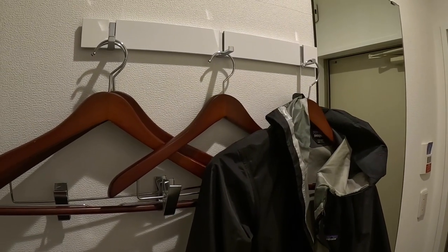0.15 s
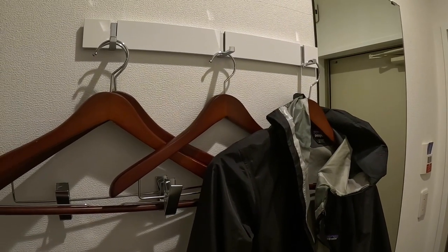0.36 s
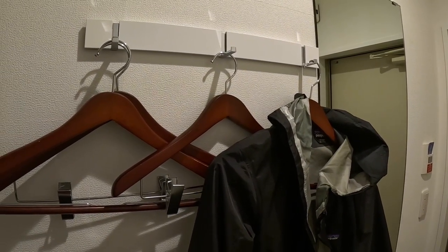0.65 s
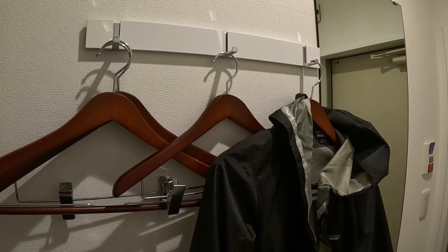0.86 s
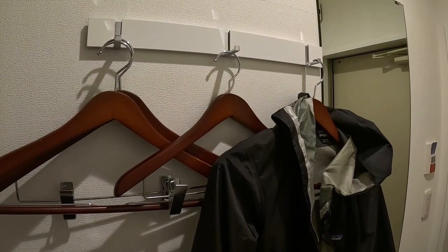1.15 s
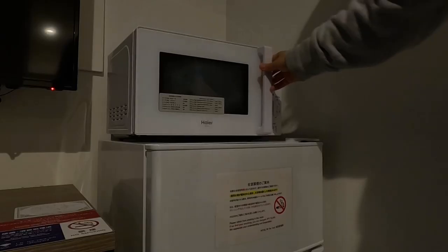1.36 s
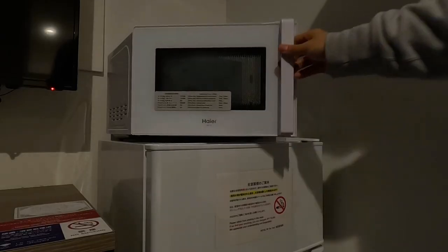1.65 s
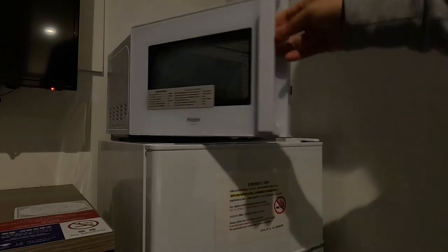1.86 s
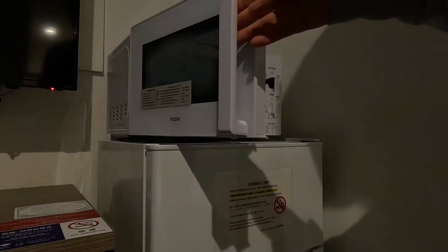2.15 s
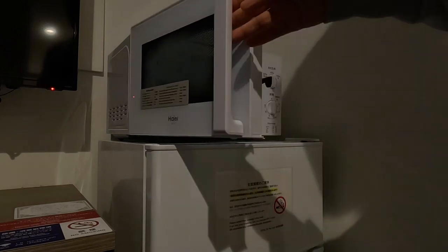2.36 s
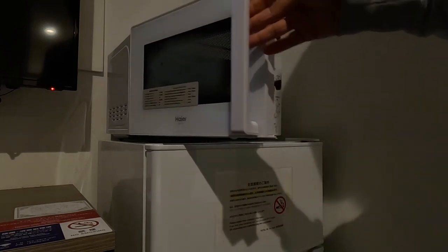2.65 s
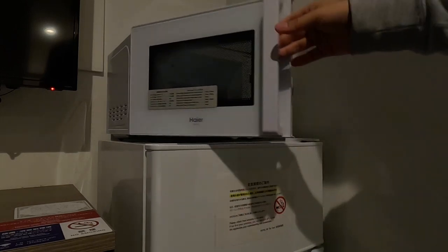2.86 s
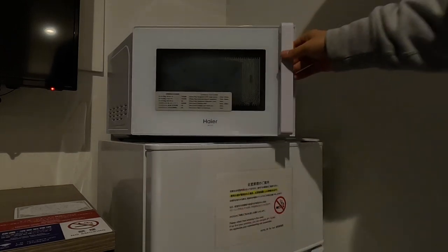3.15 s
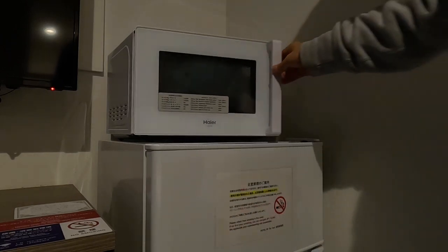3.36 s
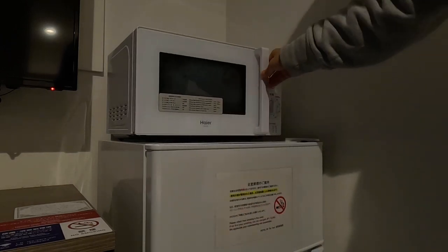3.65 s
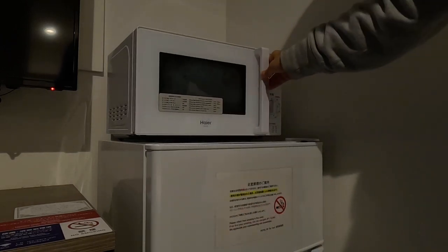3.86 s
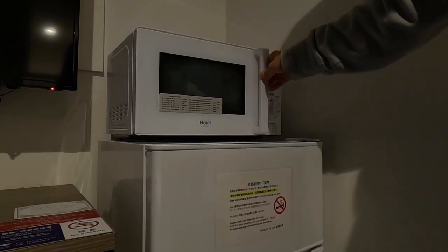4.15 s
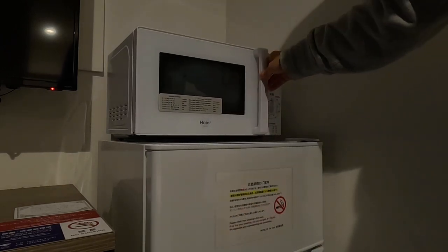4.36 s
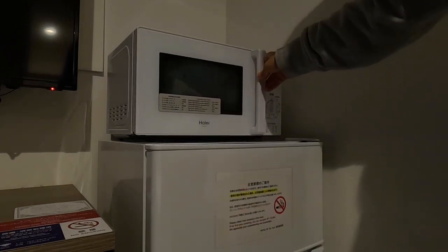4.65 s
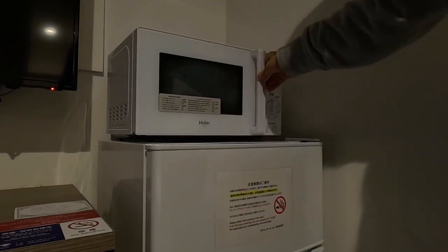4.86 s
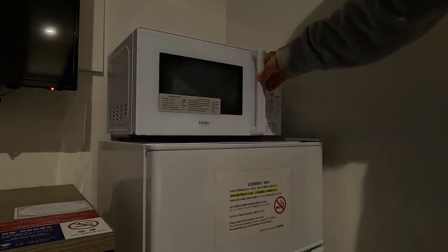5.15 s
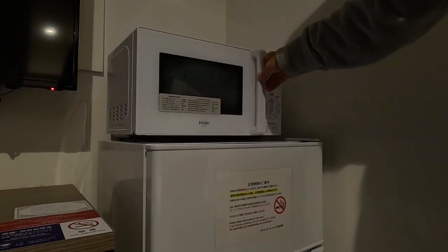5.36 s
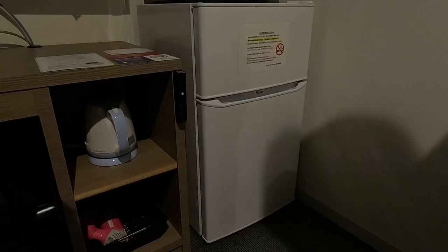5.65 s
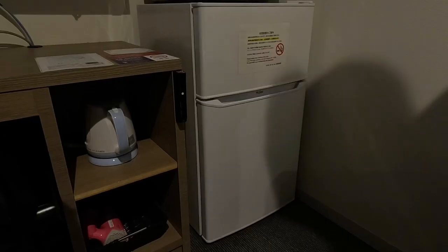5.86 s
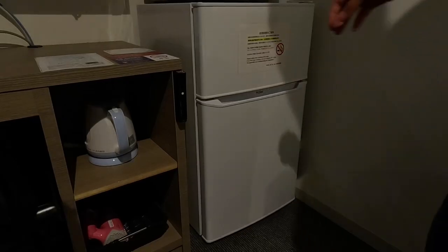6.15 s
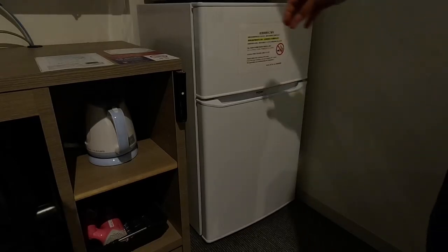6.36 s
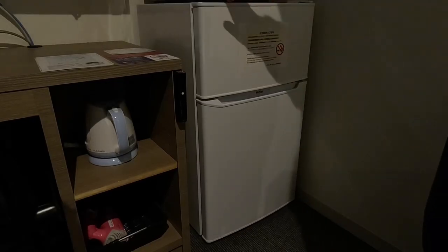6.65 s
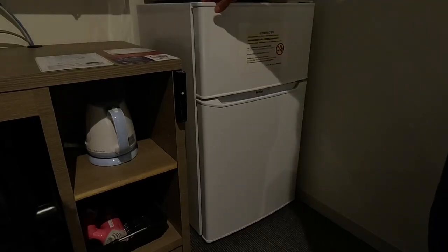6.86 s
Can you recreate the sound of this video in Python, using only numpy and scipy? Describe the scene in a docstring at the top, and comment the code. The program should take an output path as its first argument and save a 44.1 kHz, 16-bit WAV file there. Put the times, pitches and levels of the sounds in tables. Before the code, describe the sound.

A microwave door's latch lets go with a quick, loud clack, heard from nearby in a small room, and the open door rings briefly. After faint ticks and cloth rustling, the door touches its catch with a lighter click. A moment later it bangs shut with a hollow, ringing thud. Quiet rustles and small taps come last. Soft ventilation and a low building hum run underneath, changing tone slightly twice.

```python
"""A microwave oven door in a small room, over soft ventilation noise and the building's low rumble.
At 1.35 s the background noise changes at an edit cut; then the latch lets go, its impacts rattle the
panels and the free door rings in its normal modes. A sleeve rustles by friction as the door swings.
At 3.7 s the door touches its catch; at 4.6 s it is slammed: the body thuds, the sheet metal rings on.
A second cut at 5.6 s ends the ringing and changes the background; faint rustles and taps follow."""
import sys
import numpy as np
from scipy import signal
from scipy.fft import rfft, irfft, next_fast_len
from scipy.io import wavfile
from scipy.ndimage import uniform_filter1d

SR = 44100
rng = np.random.default_rng(int(sys.argv[2]) if len(sys.argv) > 2 else 0)


def inscribe(sig):
    """Save sig as 16-bit PCM at rate SR to the path in sys.argv[1].

    A 1-D sig is mono; a 2-D sig holds one channel per row.
    Samples are clipped to [-1, 1] before scaling.
    """
    pcm = np.round(np.clip(np.atleast_2d(sig).T, -1, 1) * 32767)
    wavfile.write(sys.argv[1], SR, pcm.astype(np.int16))


N = 309141
T = np.arange(N) / SR

# Latch, hinge and hand contacts: t/s, energy/dB, tilt/(dB/octave), hollow-door boost/dB, latch boost/dB,
# low thud/dB, high thud/dB, rattle time constant/s, share sent to the room/dB
CONTACTS = [(1.357, -28, 2, 0, 2, -52, -48, 0.011, -4.5), (1.3781, -15, 1, -0.5, 0, -36, -43, 0.009, 0),
            (1.4062, -1.5, 0.5, 1, 1, -35, -29, 0.0039, -4.5),
            (1.666, -34, -5.5, -12, -5, -65, -51, 0.0064, -2), (1.736, -39, -5, -7, 0, -54, -56, .008, -8),
            (1.782, -33, -4, -7, -6, -65, -52.5, 0.0063, -2),
            (1.912, -39.5, -5, 6, 0, -60, -54, 0.0068, -5.5),
            (3.069, -35.5, -1, 14.5, -3, -71, -46.5, .005, -1.5),
            (3.320, -40, 3.5, 6, -8, -65, -60, 0.0027, -9.5),
            (3.7224, -23.5, 1, 1, 3, -40, -36, .004, -4.5), (3.742, -38, -1, -6, 9, -38, -44, .0045, -.5),
            (4.531, -38, 2.5, -5, 0, -67.5, -58.5, 0.0022, -6),
            (4.609, -41, -5, 3, 1.5, -55, -57, 0.0072, -3),
            (4.624, -21, -1, 1.5, -1, -42, -47, 0.0071, -2.5),
            (4.6318, -6, 1.5, 4, 0, -38.5, -33, 0.0084, -3.5),
            (4.6432, -3.5, -2.5, -2.5, -8, -10, -13.5, 0.0022, -6),
            (4.689, -16, 0.5, -2, -1, -28, -28, 0.0097, 0), (4.965, -50, -3, 9, 0, -65, -63, .008, -5.5),
            (6.415, -45, 2, 3, 2, -68, -70, 0.0055, -13.5), (6.575, -55, -4, 0, 0, -52, -54, .008, 0),
            (6.899, -46, 5, 5, -4, -66, -81, .003, -7.5), (6.92, -55, -6, -6, 0, -38, -58, 0.0036, -4)]
# Modes of the hollow body: f/Hz, relative level/dB, T60/s
BODY_MODES = [(101, -11, 0.25), (116, -8.5, 0.3), (155.5, 2, 0.11), (162.3, -3, 0.42), (177, -1.5, 0.054),
              (195.4, -17.5, .4), (275.4, -5, .55), (283, -3, 0.2), (342.7, -3, 0.28), (380, -3, .14),
              (399, -11, 0.34), (468, -18, .3)]
# Broad resonances of latch, door and panels: f/Hz, bandwidth/Hz, relative level/dB
PANEL_RESONANCES = [(700, 760, -.5), (1350, 750, 1), (2450, 2500, -1), (3950, 1000, -1), (5400, 1100, -4),
                    (7260, 1300, -8.5), (9800, 2600, -11.5)]
def door_impacts():
    """Impact excitation: contacts rattle the panels and shake the body. Returns (direct, room feed)."""
    hollow_door, latch = 1, 3  # rows of PANEL_RESONANCES
    pivot_hz, thud_split_hz, thud_room_db = 2450, 190, -9
    direct, to_room = np.zeros((2, N + SR))
    t = np.arange(SR) / SR
    rattle_n = SR // 8
    rattle_t = t[:rattle_n]
    impulse = signal.unit_impulse(rattle_n)
    push = 1 - np.exp(-t / .003)  # a soft seal takes the blow, so the body swings up gradually
    low_thud = push * ring([m for m in BODY_MODES if m[0] <= thud_split_hz], t)
    high_thud = push * ring([m for m in BODY_MODES if m[0] > thud_split_hz], t)
    for start, energy_db, tilt_db, hollow_db, latch_db, low_db, high_db, decay_s, echo_db in CONTACTS:
        envelope = np.exp(-rattle_t / decay_s) * (1 - np.exp(-rattle_t / (.19 * decay_s)))
        bursts = rng.standard_normal((len(PANEL_RESONANCES), rattle_n)) * envelope
        rattle = smooth = 0
        for k, (hz, width_hz, panel_db) in enumerate(PANEL_RESONANCES):
            boost_db = hollow_db * (k == hollow_door) + latch_db * (k == latch)
            gain = undb(energy_db + panel_db + tilt_db * np.log2(hz / pivot_hz) + boost_db)
            edges_hz = hz - width_hz / 2, hz + width_hz / 2
            rattle += gain * unit_energy(band(bursts[k], *edges_hz))
            # the room gathers sound from all sides of the door, which evens out the colour
            smooth += gain * (-1) ** k * unit_energy(band(impulse, *edges_hz))
        thud = undb(low_db) * low_thud + undb(high_db) * high_thud
        i = int(start * SR)
        direct[i:i + SR] += thud
        direct[i:i + rattle_n] += rattle
        to_room[i:i + SR] += undb(echo_db + thud_room_db) * thud
        to_room[i:i + rattle_n] += undb(echo_db) * smooth
    return direct[:N], to_room[:N]


# Modes of the free door: f/Hz, initial rms level/dB, T60/s
DOOR_MODES = [(160, -38, 1.0), (295.6, -56.5, 4.7), (743.7, -65, .8), (882, -42.5, .6), (1180, -57, 1.4),
              (1480, -45, 0.85), (3327, -77, 1.0), (3784, -70.5, .9), (4840, -67, 1.3)]
# Modes of the shut cabinet: f/Hz, initial rms level/dB, T60/s
CABINET_MODES = [(300, -46, 5.0), (461, -38.5, 0.7), (661, -41, 0.77), (753, -59.5, .9), (1340, -58, 0.95),
                 (1450, -55.5, 1.2), (1626, -59.5, 1.56), (2277, -68.5, .6), (3402, -56.5, .7),
                 (3660, -83.5, 1.3), (4250, -61.5, 0.4), (4870, -70, .9)]
def sheet_metal():
    """Free vibration: lightly damped modes ring on after the unlatching and after the slam."""
    unlatch_s, slam_s = 1.407, 4.644
    return np.sqrt(2) * (ring(DOOR_MODES, T - unlatch_s) + ring(CABINET_MODES, T - slam_s))


# Strokes of sleeve and hand: t/s at full level, level/dB, 20 dB rise/s, hold/s, 20 dB fall/s, tilt/dB
STROKES = [(1.62, -67.5, 0.057, .02, 0.61, -10), (1.89, -66.5, 0.2, .03, 0.2, -3),
           (3.04, -77, .6, .2, .3, -1), (3.33, -74, 0.11, .05, .5, 1), (3.93, -80, .05, .05, .1, -8),
           (4.532, -59.5, .006, .002, .015, 1.5), (6.05, -81, .08, .1, 1.2, 5),
           (6.345, -68, .04, .04, .1, 1), (6.41, -70, 0.033, .015, .03, 5),
           (6.58, -57.5, .035, .04, .07, -1), (6.75, -77, .2, .2, .15, -1)]
# Spectrum of rubbing cloth: f/Hz, relative level/dB
CLOTH_SPECTRUM = [(700, -15.5), (1100, 0), (1600, -2.5), (2500, -7.5), (4000, -10.5), (7000, -9.5),
                  (10000, -17.5), (14000, -34)]
def sleeve_rustle():
    """Friction noise: sparse fibre slips roughen each stroke as it swells, holds and dies."""
    slips = rng.standard_normal(N) * undb(2.4 * rng.exponential(size=N))
    cloth = unit_rms(colour(slips, CLOTH_SPECTRUM))
    dull = colour(cloth, [(1500, 0), (3000, -6), (6000, -24)])
    bright = cloth - dull
    out = np.zeros(N)
    for full_s, db, rise, hold, fall, tilt_db in STROKES:
        drop_db = 20 * np.maximum((full_s - T) / rise, (T - full_s - hold) / fall)
        envelope = undb(db - np.maximum(drop_db, 0))
        out += envelope * (dull / undb(tilt_db) + bright * undb(tilt_db))
    return out


# Reverberation time of the room: f/Hz, T60/s
REVERB_TIMES = [(125, 0.58), (250, 0.51), (500, 0.68), (1000, .42), (2000, 0.41), (4000, 0.32),
                (8000, 0.26), (13000, 0.14)]
def reverberation(x):
    """Diffuse field: echoes build up in milliseconds, then decay exponentially, faster in the treble."""
    room_gain_db, build_up_s = 5.5, .0042
    t = np.arange(SR) / SR
    tail = 0
    for hz in 90 * 2 ** np.arange(0, 7.6, .5):
        half_octave = band(stereo_noise(SR), hz / 2 ** .25, hz * 2 ** .25)
        tail += half_octave * undb(-60 * t / on_log(REVERB_TIMES, hz))
    tail *= 1 - np.exp(-t / build_up_s)
    tail = undb(room_gain_db) * np.sqrt(2) * unit_energy(tail)  # sqrt(2) for two channels
    return signal.fftconvolve(x[None], tail, axes=1)[:, :N]


# Ventilation noise as heard before, between and after the cuts: spectrum (f/Hz, level/dB), rms level/dB
VENT_SPECTRA = [([(110, -39), (180, -19), (256, 6), (286, -17.5), (325, -3.5), (406, -4), (517, -16),
                (567, -10.5), (852, -20), (1120, -17), (1960, -34), (7420, -46), (8450, -50), (11400, -48),
                (15000, -82)], -59), ([(110, -28.5), (180, -3.5), (251, -11.5), (302, -8), (325, -21),
                (377, -16.5), (480, -19.5), (708, -29), (791, -25), (952, -34), (1210, -26.5), (1690, -40),
                (2540, -49), (9440, -53), (15000, -73.5)], -58), ([(110, -40), (180, -1.5), (229, -13),
                (261, -3), (286, -14.5), (634, -22.5), (762, -28), (836, -30), (1280, -31.5), (3290, -52.5),
                (6060, -45.5), (9440, -47), (15000, -60)], -62)]
def ventilation():
    """Broadband flow noise, nearly steady; the colour heard changes at each cut."""
    noise = stereo_noise(N) * undb(.7 * waver(2.3))
    return sum(undb(db) * unit_rms(colour(noise, spectrum)) * time_span(k)
               for k, (spectrum, db) in enumerate(VENT_SPECTRA))


# Envelopes of the deep, middle and upper rumble: t/s, level/dB
DEEP_LEVELS = [(0.0, -37), (0.04, -40), (1.02, -32), (1.11, -53), (1.21, -33), (1.27, -42), (2.26, -49),
               (2.32, -40), (2.77, -49), (2.89, -37), (3.14, -46), (3.88, -38), (4.0, -55), (4.06, -31),
               (4.12, -42), (5.29, -44), (5.58, -36), (5.62, -51), (6.97, -43), (7.01, -50)]
HUM_LEVELS = [(0.0, -53), (0.04, -47), (0.45, -52), (0.49, -43), (1.33, -52), (1.5, -44), (1.62, -61),
              (1.89, -42), (2.09, -49), (2.16, -37), (2.52, -52), (2.73, -38), (2.79, -46), (4.26, -43),
              (4.37, -34), (4.51, -43), (4.65, -34), (4.72, -46), (5.56, -44), (5.64, -70), (5.93, -55),
              (6.85, -57), (6.91, -41), (7.01, -44)]
UPPER_LEVELS = [(0.0, -51), (0.39, -53), (0.9, -47), (1.27, -47), (1.5, -44), (1.81, -53), (2.64, -53),
                (3.3, -52), (3.38, -53), (4.61, -48), (4.8, -43), (5.17, -53), (5.45, -53), (5.58, -62),
                (5.66, -62), (7.01, -56)]
# Their bands: lower f/Hz, upper f/Hz, evenness (0 to 1), waver depth/dB, waver rate/Hz
BUILDING_BANDS = [(20, 40, .7, 2, 12), (46, 66, 0.7, 1.5, 12), (72, 150, 0, 2, 9)]
def building_rumble():
    """Amplitude-modulated narrow-band noise: the two lowest bands are evened out until they hum."""
    out = 0
    for levels, settings in zip((DEEP_LEVELS, HUM_LEVELS, UPPER_LEVELS), BUILDING_BANDS):
        lo_hz, hi_hz, evenness, waver_db, waver_hz = settings
        noise = band(stereo_noise(N), lo_hz, hi_hz)
        envelope = unit_rms(np.abs(signal.hilbert(noise.sum(0), next_fast_len(N))[:N]))
        evened = unit_rms(noise / (envelope + .1) ** evenness)
        level_db = np.interp(T, *np.transpose(levels)) + waver_db * waver(waver_hz)
        out += undb(level_db) * evened
    return out


# Difference between two nearby points in the sound field: f/Hz, side level relative to mid/dB
SIDE_SPECTRUM = [(60, -34), (250, -12.5), (500, -10.5), (1000, -6.5), (2000, -4.5), (4000, -3.5),
                 (8000, -8.5), (13000, 0)]
def stereo_noise(n):
    """Spatial coherence: noise at two nearby points is alike in the bass, less so above."""
    mid, side = rng.standard_normal((2, n))
    side = colour(side, SIDE_SPECTRUM)
    return np.array([mid + side, mid - side])


def ring(modes, t):
    """Damped harmonic oscillators, struck at t = 0."""
    t = np.maximum(t, 0)
    return sum(undb(db) * np.sin(2 * np.pi * hz * t) * undb(-60 * t / t60) for hz, db, t60 in modes)


def time_span(k):
    """Gating: gain 1 before (k = 0), between (1) or after (2) the cuts, with short linear fades."""
    edges_s, fade_s = (-1., 1.352, 5.612, 9.), .012
    return np.clip((T - edges_s[k]) / fade_s, 0, 1) - np.clip((T - edges_s[k + 1]) / fade_s, 0, 1)


def waver(rate_hz):
    """Random modulation: held values, smoothed twice, with a spread near 1."""
    hold = int(SR / rate_hz)
    steps = np.repeat(rng.standard_normal(256)[:N // hold + 1], hold)
    return 1.3 * uniform_filter1d(uniform_filter1d(steps, hold), hold)[:N]


def colour(x, spectrum):
    """Spectral shaping by a curve of f/Hz, gain/dB."""
    n = x.shape[-1]
    hz = np.arange(n // 2 + 1) * SR / n
    return irfft(rfft(x) * undb(on_log(spectrum, hz)), n)


def band(x, lo_hz, hi_hz):
    """Causal band-pass filtering."""
    edges_hz = [lo_hz, min(hi_hz, .45 * SR)]
    return signal.sosfilt(signal.butter(2, edges_hz, "bandpass", fs=SR, output="sos"), x)


def on_log(points, hz):
    """Interpolation of (f/Hz, value) points on a logarithmic frequency axis."""
    knots_hz, values = np.array(points, float).T
    return np.interp(np.log(np.maximum(hz, 1)), np.log(knots_hz), values)


def undb(db):
    """Decibels to amplitude ratio."""
    return 10 ** (np.asarray(db) / 20)


def unit_rms(x):
    """Normalisation to rms 1."""
    return x / np.sqrt(np.mean(x ** 2))


def unit_energy(x):
    """Normalisation to energy 1, whatever the duration."""
    return x / np.sqrt(np.sum(x ** 2))


def scene():
    """Superposition of direct and reverberant sound; the sleeve is close, so its echo is weak."""
    impacts, to_room = door_impacts()
    sleeve = sleeve_rustle()
    echoes = reverberation(to_room + undb(-10) * sleeve)
    ringing = sheet_metal() * time_span(1)
    return impacts + sleeve + echoes + ringing + ventilation() + building_rumble()


def record(dry):
    """Band limiting: the microphone dulls the highest treble and a steep low-pass cuts the top."""
    mic_hz, top_hz = 12300, 15600
    dull = signal.sosfilt(signal.butter(4, mic_hz, fs=SR, output="sos"), dry)
    return signal.sosfilt(signal.ellip(8, .2, 70, top_hz, fs=SR, output="sos"), dull)


dry = scene()
out = record(dry)
inscribe(out)
```